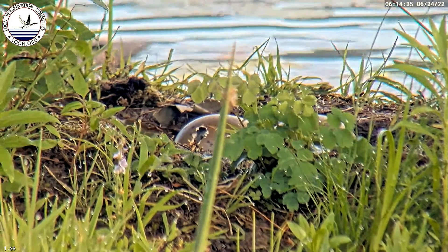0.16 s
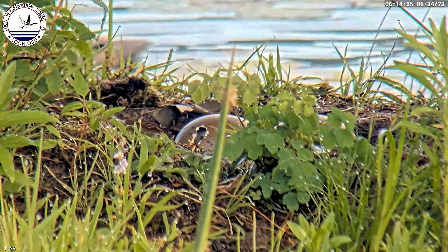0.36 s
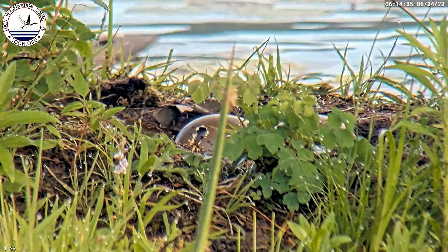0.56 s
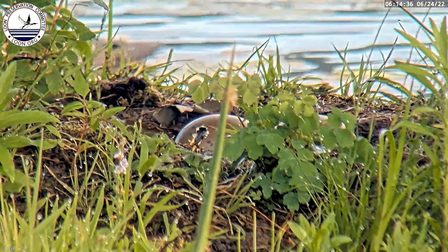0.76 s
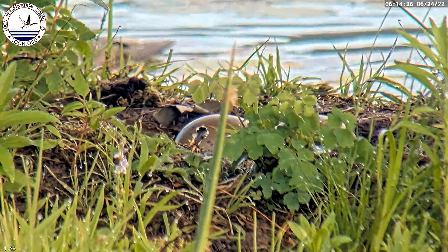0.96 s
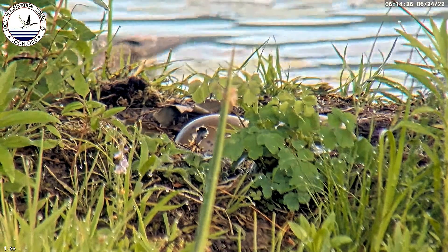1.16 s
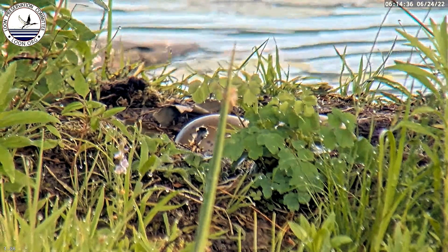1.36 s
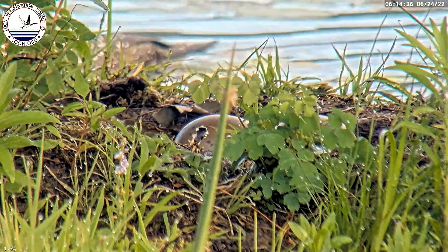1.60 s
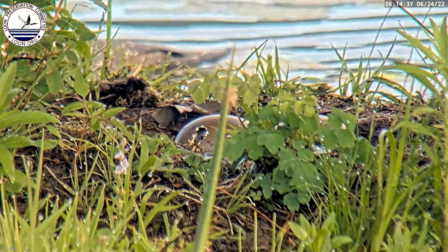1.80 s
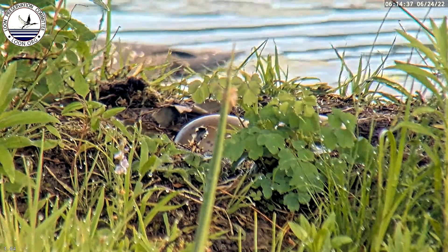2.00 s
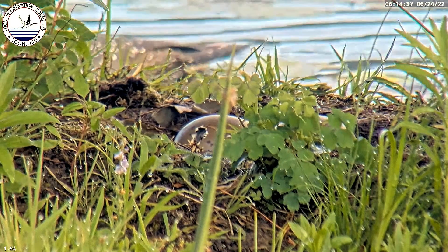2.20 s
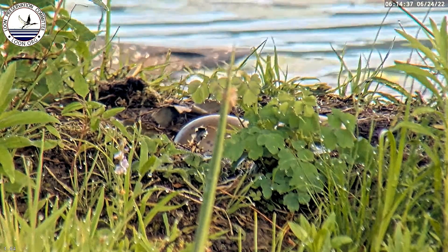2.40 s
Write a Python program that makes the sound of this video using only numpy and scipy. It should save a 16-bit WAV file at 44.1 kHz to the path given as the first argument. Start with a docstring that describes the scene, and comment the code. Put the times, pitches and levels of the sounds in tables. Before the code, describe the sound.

Close, clear mono pickup of a lakeside songbird, its low throbbing notes and sharp whistles running into a buzzy trill that stops abruptly, followed by a thin far bird, a small plop and quiet smooth background noise.

```python
"""Songbird by a lake

Two low gurgles, clear whistles from both sides of the syrinx and a short buzz lead into a long trill.
The song is built from gliding tones, flutter and puffs of air on two voices, with reed and shore scatter.
A far bird warbles afterwards in thin wavering tones, and a drop of water rings two damped bubbles.
Faint clicks are puffs of banded noise, and a smooth wide hiss of shaped noise lies under it all."""
import sys
import numpy as np
from scipy import signal
from scipy.fft import rfft, irfft
from scipy.io import wavfile
from scipy.ndimage import uniform_filter1d

SR = 44100
rng = np.random.default_rng(int(sys.argv[2]) if len(sys.argv) > 2 else 0)


def waveform_to_disk(signal):
    """Save audio, clipped to [-1, 1], as 16-bit WAV at the path in sys.argv[1]."""
    frames = np.transpose(np.atleast_2d(signal))
    scaled = np.clip(frames, -1, 1) * 32767
    samples = np.round(scaled).astype(np.int16)
    wavfile.write(sys.argv[1], SR, samples)


def how_loud(loudness_db):
    """Turn decibels into a plain amplitude multiplier (0 dB gives 1, 20 dB gives 10)."""
    steps = np.asarray(loudness_db, float) / 20
    return 10 ** steps


N = 108045
T = np.arange(N) / SR  # clock of the scene, s

# spectral slope of the hiss, its overall level set apart: [f/Hz, relative level/dB per Hz]
HISS_SPECTRUM = [(12, -59), (20, -31), (92, -4.5), (161, -4), (225, -2), (393, -3), (550, -3.5),
                 (1070, -6.5), (2340, -10.5), (3180, -12.5), (4310, -15.5), (10800, -24.5), (15500, -33)]
# faint clicks: [centre t/s, centre f/Hz, width f/Hz, level/dB]
CLICK_BURSTS = [(0.593, 1710, 300, -51.5), (0.6606, 1850, 300, -58), (.6595, 4200, 400, -64),
                (.795, 2000, 500, -62), (2.104, 6000, 2000, -62)]
# ringing bubbles: [start t/s, start f/Hz, rise/(Hz/s), peak level/dB, T60/s, life until it bursts/s]
BUBBLE_RINGS = [(2.0835, 1430, 30300, -45.5, 0.054, 0.02), (2.0838, 809, 27800, -50.5, 0.19, 0.021)]
# far bird, one pitch and level curve per phrase: [t/s, f/Hz, level/dB]
FAR_PHRASES = [
    [(1.6, 2750, -97), (1.63, 2850, -74), (1.65, 3244, -77), (1.69, 3080, -75), (1.715, 3280, -74),
     (1.75, 3350, -70), (1.8, 3240, -74), (1.83, 3265, -76), (1.85, 3100, -71)],
    [(1.86, 3470, -73), (1.885, 3500, -74), (1.9, 3500, -79), (1.92, 3500, -71), (1.945, 3200, -72),
     (1.97, 3170, -77)],
    [(2., 3450, -77), (2.022, 3050, -81), (2.035, 2810, -66), (2.06, 2650, -69), (2.095, 2570, -70)],
    [(2.11, 2800, -75), (2.135, 3150, -68), (2.16, 2950, -81), (2.185, 2890, -69), (2.21, 2850, -76),
     (2.235, 2750, -74), (2.26, 2730, -69)],
    [(2.365, 5350, -74), (2.375, 5260, -72), (2.385, 4900, -80), (2.395, 4650, -73), (2.41, 4500, -85)],
]
# gurgles, one curve per note before the throb: [t/s, f/Hz, level/dB]
GURGLE_NOTES = [
    [(.175, 1257, -62), (.19, 1262, -57.5), (.21, 1236, -54), (.268, 1255, -55), (.29, 1268, -59.5),
     (.31, 1270, -66)],
    [(.42, 1279, -60), (.433, 1219, -54.5), (.47, 1188, -56.5), (.51, 1204, -62.5), (.55, 1244, -71)],
]
# a moment of full level in the throb of each gurgle: [t/s]
THROB_PEAKS = (.2093, .4325)
# whistled notes, one curve each: [t/s, f/Hz, level/dB]
NOTE_A = [(.335, 2385, -72), (.345, 2454, -62), (.36, 2420, -48.5), (.375, 2397, -44.5),
          (.387, 2339, -40.5), (.391, 2390, -49.5), (.393, 2390, -68), (.4, 2450, -68)]
NOTE_B = [(0.588, 1593, -92), (0.596, 1483, -45.5), (0.604, 1573, -51), (0.628, 1690, -60),
          (0.655, 1750, -71)]
NOTE_C = [(.628, 2634, -67), (.636, 2625, -58), (.651, 2618, -50), (0.6564, 2640, -70),
          (0.6601, 2676, -41.5), (.664, 2503, -61), (0.667, 2505, -52.5), (0.683, 2538, -44.5),
          (0.691, 2250, -30.5), (0.691, 2560, -62), (0.697, 2600, -48.5), (0.736, 2495, -60),
          (.744, 2560, -49.5), (.755, 2610, -40.5), (0.762, 2580, -59), (.768, 2540, -63)]
NOTE_D = [(0.669, 2150, -70), (0.685, 2159, -45.5), (0.692, 2203, -42.5), (0.699, 2080, -55),
          (.71, 2260, -59), (.72, 2120, -72)]
NOTE_E = [(.643, 3400, -72), (.652, 3525, -56), (0.657, 3540, -70), (.66, 3640, -48.5), (.665, 3600, -75)]
NOTE_F = [(0.691, 2830, -72), (0.701, 3140, -58), (.71, 2930, -74)]
NOTE_G = [(0.708, 5140, -69), (0.726, 5060, -53.5), (0.744, 5105, -51), (0.758, 5080, -75)]
NOTE_H = [(.676, 2680, -71), (0.687, 2720, -46), (0.692, 2760, -65)]
# buzz, one curve per voice before the flutter: [t/s, f/Hz, level/dB]
BUZZ_VOICES = [
    [(.757, 3710, -76), (.765, 3645, -55), (.782, 3720, -47.5), (.8, 3800, -48), (.82, 3740, -56),
     (.845, 3500, -52)],
    [(.76, 2850, -61), (.775, 2880, -49.5), (.795, 2913, -49), (.81, 3115, -43.5), (.832, 3010, -48.5),
     (.843, 2900, -51)],
    [(.757, 4150, -68), (.78, 4060, -56.5), (.8, 4164, -53), (.845, 3980, -79)],
    [(.757, 4800, -68), (.785, 4630, -64), (.81, 4900, -71), (.845, 4980, -69)],
    [(.765, 2300, -62), (.795, 2183, -63), (.845, 2300, -66)],
]
# trill tempo, slowing a little: [beat number, t/s]
BEAT_TIMES = [(0, .8518), (6, .9345), (12, 1.0187), (18, 1.103), (24, 1.189), (30, 1.276), (36, 1.3639),
              (42, 1.4532), (46, 1.5128)]
# trill effort: [t/s, level/dB]
TRILL_EFFORT = [(.84, -46), (.852, -46.5), (.865, -46.5), (.93, -43), (1.05, -44), (1.11, -43), (1.3, -43),
                (1.495, -42.5), (1.505, -45), (1.514, -52), (1.525, -62)]
# puffs of one beat, low and high voice: [centre t/s from the beat, length/s, level/dB re effort]
PUFFS_LOW = [(.0004, .0105, 0), (.0068, .0075, -3.5)]
PUFFS_HIGH = [(-0.00031, 0.0079, -16), (0.0071, 0.0076, -13.5), (0.0021, 0.0045, -18)]
# side tones of the low voice: [offset f/Hz, level/dB re effort, puff centre t/s from the beat, puff length/s]
SIDE_TONES = [(-320, -5.5, -.0005, .008), (270, -11, .0006, .008), (-300, -14, .007, .005),
              (-640, -22, -.002, .0035)]

THIRD_PARTIAL_DB = -35  # below the fundamental, in whistle and trill


def band(hz, width_hz):
    """Complex noise in a bell around hz, power 1; the real part has rms 0.71 well above 0 Hz, 1 around 0 Hz."""
    f = np.fft.fftfreq(N, 1 / SR)
    bell = np.exp(-((f - hz) / width_hz) ** 2)
    z = np.fft.ifft(np.fft.fft(rng.standard_normal(N)) * bell)
    return z / np.sqrt(np.mean(abs(z) ** 2))


def tone(rows, swing_hz=0.):
    """Complex tone that follows a pitch and level curve, rounded and faded at both ends."""
    s, hz, db = np.array(rows, float).T
    edge = np.clip(np.minimum(T - s[0], s[-1] - T) / 0.0015, 0, 1)
    cycles = np.cumsum(np.interp(T, s, hz) + swing_hz) / SR + rng.random()
    level_db = np.interp(T, s, db)
    for _ in range(2):  # round the corners of the level curve
        level_db = uniform_filter1d(level_db, size=70)
    return np.sqrt(2) * edge * how_loud(level_db) * np.exp(2j * np.pi * cycles)


def puff(since, centre_s, length_s):
    """Smooth cosine-squared bump; since is the time the centre is counted on."""
    return np.cos(np.pi * np.clip((since - centre_s) / length_s, -.5, .5)) ** 2


def ground_dip(x):
    """Notch in the near bird's tone where the direct and ground paths cancel."""
    dip_hz, width_hz, depth_db = 3390, 73, -18
    f = np.fft.rfftfreq(N, 1 / SR)
    dip = how_loud(depth_db * np.exp(-((f - dip_hz) / width_hz) ** 2))
    return irfft(dip * rfft(x), N)


def scatter(birds):
    """Decaying noise echoes: a short scatter from the reeds and a longer one from the shore."""
    reeds_db, reeds_t60_s = -16, .08  # levels count the whole tail, before its first 4 ms are muted
    shore_db, shore_t60_s = -25, .6
    u = T[:SR // 2]

    def fade(t60_s):
        """Exponential decay of unit energy."""
        return how_loud(-60 * u / t60_s) / np.sqrt(np.sum(how_loud(-120 * u / t60_s)))

    decay = how_loud(reeds_db) * fade(reeds_t60_s) + how_loud(shore_db) * fade(shore_t60_s)
    tail = rng.standard_normal(len(u)) * decay * (u > .004)
    return signal.fftconvolve(birds, tail)[:N]


def hiss():
    """Smooth distant noise of water and air, random noise shaped by a spectral curve."""
    rms_db = -62
    hz, db = np.array(HISS_SPECTRUM).T
    f = np.maximum(np.fft.rfftfreq(N, 1 / SR), 1)
    shape = how_loud(np.interp(np.log(f), np.log(hz), db))
    noise = irfft(rfft(rng.standard_normal(N)) * shape, N)
    return noise * how_loud(rms_db) / np.sqrt(np.mean(noise ** 2))


def clicks():
    """Short puffs of banded noise, heard as faint clicks."""
    length_s = 0.0043
    out = 0
    for s, hz, width_hz, db in CLICK_BURSTS:
        out = out + how_loud(db) * puff(T, s, length_s) * band(hz, width_hz).real
    return out


def bubbles():
    """Damped tones that rise as the bubble nears the surface, then stop as it bursts."""
    out = 0
    for s, hz, rise, db, t60_s, life_s in BUBBLE_RINGS:
        u = np.maximum(T - s, 0)
        attack = np.minimum(u / 0.00087, 1)
        burst = np.clip((life_s - u) / .004, 0, 1)
        ring = np.sin(2 * np.pi * (hz * u + rise * u ** 2 / 2))
        out = out + how_loud(db - 60 * u / t60_s) * attack * burst * ring
    return out


def far_bird():
    """Thin whistles that waver in pitch and come and go on the air, by slow noise on pitch and level."""
    wander_hz, flicker_db = 50, 2.5  # each scales slow noise of rms 1
    out = 0
    for phrase in FAR_PHRASES:
        wander = wander_hz * band(0, 48.8).real
        flicker = how_loud(flicker_db * band(0, 25).real)
        out = out + (tone(phrase, wander) * flicker).real
    return out


def gurgles():
    """Low notes whose level throbs, with a weak octave."""
    throb_hz, throb_depth, octave_db = 52.5, .82, -15
    out = 0
    for note, peak_s in zip(GURGLE_NOTES, THROB_PEAKS):
        throb = 1 - throb_depth * np.sin(np.pi * throb_hz * (T - peak_s)) ** 2
        z = tone(note) * throb
        octave = how_loud(octave_db) * z * np.exp(1j * np.angle(z))
        out = out + (z + octave).real
    return out


def whistles():
    """Gliding sines from both sides of the syrinx; the longest note has a faint third partial."""
    notes = [NOTE_A, NOTE_B, NOTE_C, NOTE_D, NOTE_E, NOTE_F, NOTE_G, NOTE_H]
    z = [tone(note) for note in notes]
    longest = z[2]
    third = longest * np.exp(2j * np.angle(longest))
    return sum(v.real for v in z) + how_loud(THIRD_PARTIAL_DB) * third.real


def buzz():
    """Voices that swing in pitch and level with one quickening flutter, roughened by breathy noise."""
    flutter_hz, quickening_hz_s, peak_s = 150, 230, .782  # the rate holds at peak_s
    depth, sharpness, swing_hz, roughness = .4, 1.3, 170, .2
    u = T - peak_s
    phase = 2 * np.pi * (flutter_hz * u + quickening_hz_s * u ** 2 / 2)
    chop = 1 - depth + 2 * depth * abs(np.cos(phase / 2)) ** (2 * sharpness)
    swing = swing_hz * np.sin(phase)
    out = 0
    for voice in BUZZ_VOICES:
        breath = 1 + roughness * band(0, 420)
        out = out + (tone(voice, swing) * chop * breath).real
    return out


def wandering_voice(hz, wander_hz, rate_hz):
    """Steady complex tone whose pitch drifts with slow noise; wander_hz is the rms of the drift."""
    return np.exp(2j * np.pi * np.cumsum(hz + wander_hz * band(0, rate_hz).real) / SR)


def trill():
    """Each beat blows the same puffs on two voices, a little early or late, every puff louder or softer."""
    jitter_s, beat_scatter_db, puff_scatter_db, side_scatter_rad = .0003, .7, 1.4, .45  # standard deviations
    side_peak_s = -.0019  # side tones line up here, but for their phase scatter
    high_hz = 3740

    k = np.arange(BEAT_TIMES[-1][0] + 1)
    chance = rng.standard_normal((20, len(k)))
    beats = np.interp(k, *np.array(BEAT_TIMES).T) + jitter_s * chance[0]
    draws = iter(chance[2:])

    # every sample hears the beat before it and the beat after it, so their puffs may overlap
    coming = np.searchsorted(beats, T)
    near = np.array([coming - 1, coming])
    beat = near % len(k)
    exists = (near >= 0) * (near < len(k))
    gain = how_loud(beat_scatter_db * chance[1])[beat] * exists
    since = T - beats[beat]

    def blow(centre_s, length_s, db):
        """One puff on every beat, with its own level scatter."""
        return how_loud(db + puff_scatter_db * next(draws))[beat] * puff(since, centre_s, length_s)

    low = sum(blow(*p) for p in PUFFS_LOW)
    for offset_hz, db, centre_s, length_s in SIDE_TONES:
        side = blow(centre_s, length_s, db)
        phase = 2 * np.pi * offset_hz * (since - side_peak_s) + side_scatter_rad * next(draws)[beat]
        low = low + side * np.exp(1j * phase)
    high = sum(blow(*p) for p in PUFFS_HIGH)
    low, high = (gain * low).sum(axis=0), (gain * high).sum(axis=0)

    # the low voice is near sine, the high one rougher with a rasp of noise
    voice = wandering_voice(2918, 55, 89)
    upper = wandering_voice(high_hz, 111.1, 208)
    rough = upper + .7 * band(high_hz, 650) + how_loud(-13) * band(4500, 530)
    third = how_loud(THIRD_PARTIAL_DB) * abs(low) * voice ** 3
    song = low * voice + third + high * rough
    effort = how_loud(np.interp(T, *np.array(TRILL_EFFORT).T))
    return np.sqrt(2) * effort * song.real


def scene():
    """Near and far bird with their reed and shore scatter, over clicks, bubbles and hiss."""
    near_bird = whistles() + gurgles() + buzz() + trill()
    birds = ground_dip(near_bird) + far_bird()
    mix = birds + scatter(birds) + clicks() + bubbles() + hiss()
    return mix[None]


def roll_off(x):
    """The treble ends steeply here."""
    return signal.sosfilt(signal.butter(12, 15680, fs=SR, output="sos"), x)


def record(dry):
    """Delivers the finished mono mix."""
    return roll_off(dry)


dry = scene()
out = record(dry)
waveform_to_disk(out)
```